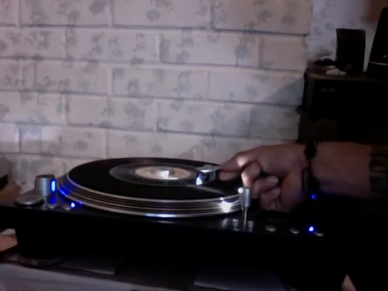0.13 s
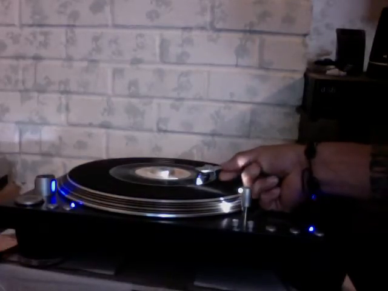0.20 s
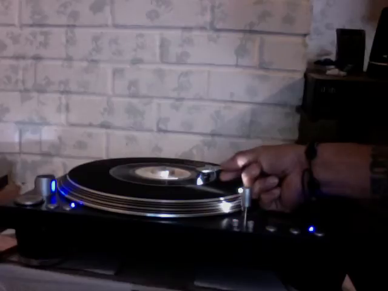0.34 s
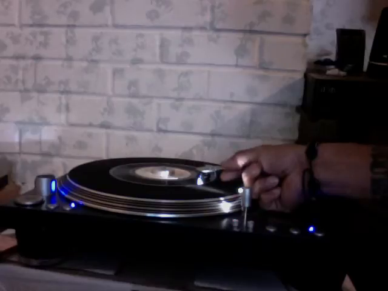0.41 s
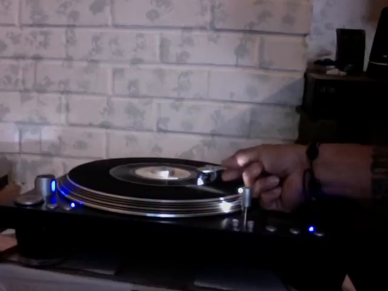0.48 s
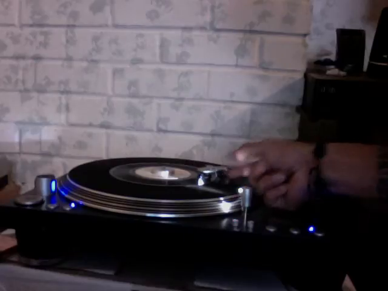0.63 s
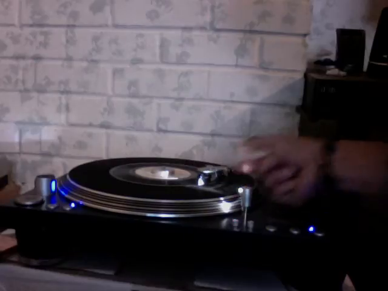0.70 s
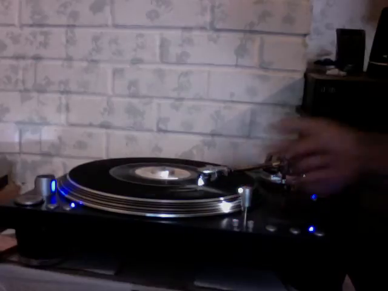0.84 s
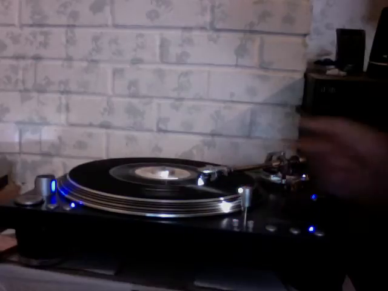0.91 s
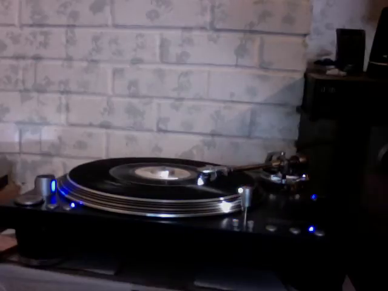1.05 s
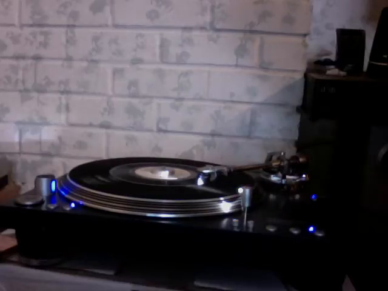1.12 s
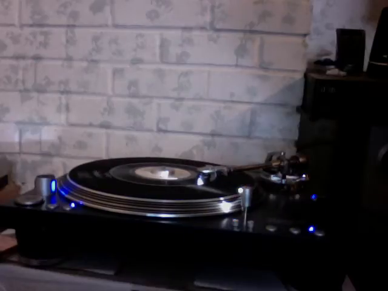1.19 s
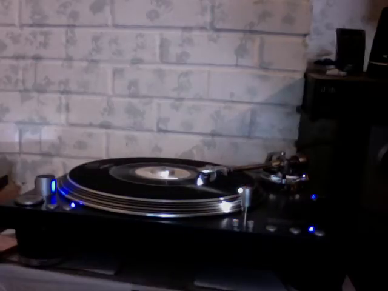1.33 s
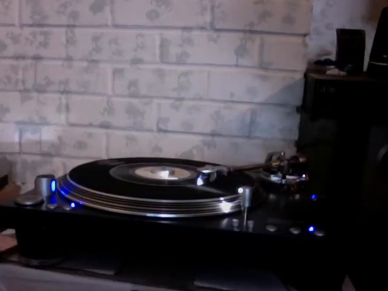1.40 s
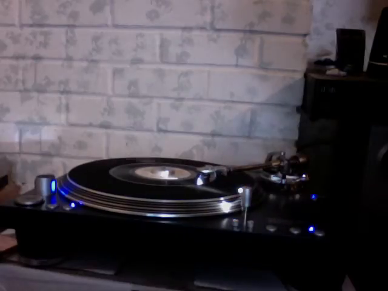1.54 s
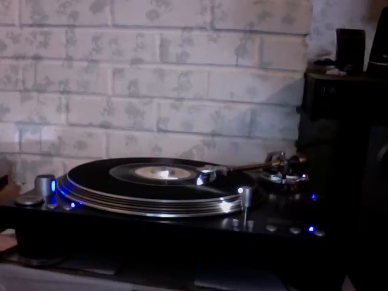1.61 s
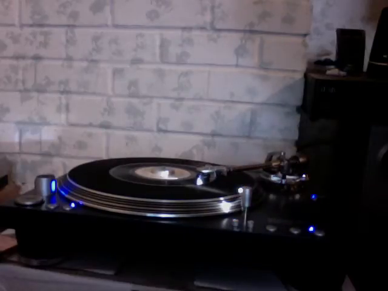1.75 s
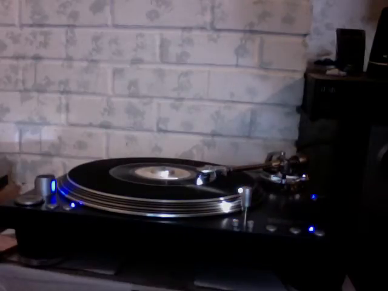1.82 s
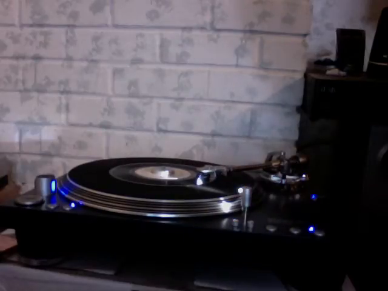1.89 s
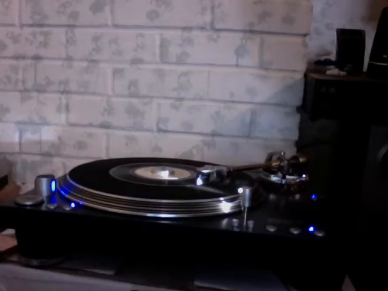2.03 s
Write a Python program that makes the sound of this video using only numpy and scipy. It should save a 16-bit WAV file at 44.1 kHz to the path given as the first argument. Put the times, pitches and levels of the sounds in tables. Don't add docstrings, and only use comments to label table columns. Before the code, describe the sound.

Vinyl crackle, dry and direct, almost all in the left channel, over steady groove hiss and low rumble. Sparse sharp clicks lead to a hard, clipped needle thump at 0.22 s. Pops thicken around 0.5, with another deep wobbling thump at 0.58 and a harsh crackle burst at 0.74. Dense pops peak at 1.07-1.15, smaller bumps follow at 1.33-1.53, then quieter, duller hiss and isolated ticks, one sharp at 1.86.

```python
import sys
import numpy as np
from scipy import signal
from scipy.fft import rfft, irfft
from scipy.io import wavfile

SR = 44100
rng = np.random.default_rng(int(sys.argv[2]) if len(sys.argv) > 2 else 0)


def magnitude_from_level(level_db):
    exponent = np.asarray(level_db, float) / 20
    return 10 ** exponent


def master(y):
    cut = np.clip(np.atleast_2d(y).T, -1, 1)
    pcm = np.round(cut * 32767)
    wavfile.write(sys.argv[1], SR, pcm.astype(np.int16))


N = 92610

# centre in Hz, width in Hz, level in dB.
RUMBLE = [
    (13.15, 1.8, -32),
    (29.3, 18, -39.5),
    (58, 37.6, -38.5),
    (113, 30, -68),
]
# start in seconds, signed height (1 = full scale),
# ringing pitch in Hz, time to fall by 60 dB in seconds.
JOLTS = [(.2235, -3, 150, .007), (.225, .64, 38, .19), (.2438, -4, 55, .016), (.2469, 1.6, 18, .09),
         (.5779, .54, 40.5, .24), (1.3288, .17, 14, .4), (1.4022, .18, 22, .09), (1.5312, -.2, 125, .04),
         (.887, .2, 110, .03), (.963, .08, 60, .12), (1.1438, .3, 65, .06), (.0875, .07, 330, .02),
         (1.3272, -.2, 150, .012), (1.3995, -.25, 130, .015)]
# start in seconds, signed height (1 = full scale),
# pitch in Hz, time to fall by 60 dB in seconds.
SWAYS = [
    (.29, .1, 27.3, 1.0),
    (.608, .3, 15.2, 1.3),
    (1.277, .09, 21, .5),
    (1.638, -.09, 28, .25),
    (1.724, .08, 29, .7),
    (.61, .06, 108, .7),
    (.93, .03, 120, .4),
]
# time in seconds, level in dB.
WEAR = [
    (0, -45.5),
    (.6, -44),
    (1.05, -40.5),
    (1.5, -47),
    (2.1, -53),
]
# frequency in Hz, level in dB per Hz.
HISS_COLOUR = [(60, -4), (250, -4), (1200, -24), (3500, -29), (9000, -39), (16000, -32)]
GRAIN_CUTS_HZ = [460, 3300, 2700]
# start in seconds, length in seconds, level in dB,
# share of fine grit from 0 to 1.
SCUFFS = [(0.054, 0.043, -41.5, 0.05), (0.123, 0.013, -36.5, 0.5), (0.22, 0.035, -31, 0.63),
          (0.33, 0.017, -39, 0.02), (0.413, 0.1, -41.5, 0.98), (0.507, 0.036, -33, 1),
          (0.541, 0.041, -30.5, 1), (0.569, 0.054, -37.5, 1), (0.62, 0.075, -42, 1),
          (0.663, 0.02, -35.5, 0.9), (0.699, 0.072, -35, 0.95), (0.736, 0.03, -23, 0.6),
          (0.768, 0.014, -36, 0.9), (0.875, 0.02, -32, 0.8), (0.936, 0.072, -31, 0.6),
          (0.989, 0.064, -39, 0.53), (1.077, 0.015, -23, 0.9), (1.103, 0.012, -23, 0.82),
          (1.13, 0.035, -24.5, 0.58), (1.214, 0.057, -37, 0.7), (1.327, 0.008, -30.5, 0.61),
          (1.377, 0.029, -34.5, 0.91), (1.485, 0.022, -38.5, 0.4), (1.531, 0.012, -30, 0.72),
          (1.548, 0.051, -31, 0.63), (1.604, 0.035, -38.5, 0.05), (1.765, 0.0037, -30.5, 0)]
# time in seconds, signed height (1 = full scale), width in ms.
POPS = [(0.0167, -0.54, 0.037), (0.0539, 0.32, 0.027), (0.0662, 0.12, 0.38), (0.132, 0.081, 0.05),
        (0.1387, 0.14, 0.12), (0.168, 0.6, 0.053), (0.1676, -0.11, 0.2), (0.18726, 0.24, 0.027),
        (0.20245, 0.52, 0.087), (0.203, 0.11, 0.48), (0.231, -0.033, 0.18), (0.232, -0.12, 0.24),
        (0.2417, -0.18, 0.068), (0.3341, -0.14, 0.24), (0.34388, -0.25, 0.069),
        (0.4187, -0.36, 0.057), (0.4214, 0.16, 0.12), (0.4215, -0.53, 0.071), (0.42977, 0.0079, 0.03),
        (0.4445, 0.63, 0.076), (0.4449, -0.056, 0.21), (0.51626, -0.22, 0.03), (0.52481, 0.17, 0.066),
        (0.53553, 0.41, 0.056), (0.5475, 0.6, 0.022), (0.54871, -0.22, 0.11), (0.5514, 0.43, 0.03),
        (0.5591, 0.81, 0.043), (0.55923, -0.11, 0.03), (0.565, -1.27, 0.043), (0.5702, 0.27, 0.08),
        (0.5744, 0.51, 0.025), (0.5734, 0.45, 0.026), (0.5777, -0.51, 0.4), (0.5947, 0.16, 0.066),
        (0.59642, -1.6, 0.094), (0.5965, 0.63, 0.18), (0.60243, 0.64, 0.1), (0.6064, 0.31, 0.13),
        (0.62977, -0.25, 0.042), (0.6319, 0.29, 0.073), (0.6365, -0.48, 0.084), (0.6676, 0.27, 0.12),
        (0.6707, 0.17, 0.18), (0.6705, -0.48, 0.073), (0.6711, 0.32, 0.1), (0.6727, -0.55, 0.048),
        (0.675, -0.32, 0.065), (0.67503, 0.38, 0.32), (0.6764, -0.15, 0.12), (0.6809, -0.18, 0.08),
        (0.6898, -0.19, 0.034), (0.7282, -0.36, 0.079), (0.7287, 0.065, 0.24), (0.7305, -0.34, 0.085),
        (0.7395, -1.5, 0.065),
        (0.7393, 0.13, 0.22), (0.7406, -0.14, 0.14), (0.7424, -0.24, 0.23), (0.7432, -0.88, 0.094),
               (0.7429, 0.63, 0.11), (0.7446, 0.5, 0.12), (0.7443, -0.6, 0.1), (0.7452, 0.72, 0.6),
               (0.7454, 0.23, 0.2), (0.7455, -0.54, 0.099), (0.7482, -0.42, 0.088), (0.7484, 0.41, 0.18),
               (0.74964, -0.42, 0.045), (0.7504, 0.41, 0.13), (0.7517, -0.39, 0.14), (0.75295, -0.2, 0.55),
               (0.75472, -0.58, 0.11), (0.7566, -0.47, 0.059), (0.75737, 0.31, 0.12), (0.7599, 0.49, 0.19),
               (0.80753, -0.31, 0.11), (0.8149, 0.16, 0.2), (0.8345, 0.11, 0.3), (0.8535, -0.22, 0.075),
               (0.87079, 0.27, 0.14), (0.8834, -0.25, 0.05), (0.8844, 0.2, 0.42), (0.8875, 0.23, 0.073),
               (0.88982, -0.27, 0.054), (0.9003, -0.2, 0.12), (0.93823, 0.24, 0.25), (0.9391, 0.2, 0.12),
               (0.9419, -0.22, 0.14), (0.9479, -0.18, 0.055), (0.9636, -0.28, 0.074), (0.974, 0.33, 0.13),
               (0.995, -0.13, 0.046), (0.9983, -0.33, 0.31), (0.99939, -0.38, 0.084), (0.99959, 0.44, 0.18),
               (1.0157, -0.29, 0.07), (1.0295, -0.3, 0.11), (1.0313, -0.44, 0.096), (1.0366, -0.22, 0.12),
               (1.04601, -0.38, 0.12), (1.0492, 0.26, 0.13), (1.051, -0.38, 0.094), (1.0607, -0.27, 0.057),
               (1.0732, -0.83, 0.12), (1.0745, 0.23, 0.074), (1.0734, -0.15, 0.031), (1.0748, -0.34, 0.071),
               (1.07732, -0.19, 0.088), (1.083, 0.006, 0.21), (1.0867, -0.41, 0.05), (1.1049, -0.35, 0.12),
        (1.11113, 0.086, 0.22), (1.12782, -0.51, 0.094), (1.128, -1.6, 0.14), (1.12825, 0.97, 0.12),
             (1.12859, 0.15, 1), (1.13345, -0.56, 0.23), (1.1337, 0.42, 0.098), (1.13537, -0.33, 0.099),
             (1.1371, -0.64, 0.043), (1.13882, -0.2, 0.059), (1.14381, -0.55, 0.054), (1.14399, 0.23, 0.15),
             (1.1442, 0.75, 0.42), (1.14492, 0.3, 1), (1.14599, -0.35, 0.056), (1.14694, -0.37, 0.21),
             (1.16041, -0.03, 0.13), (1.16066, -0.6, 0.16), (1.16127, -0.3, 0.1), (1.18122, -0.34, 0.094),
             (1.1893, 0.056, 1), (1.22862, 0.14, 0.23), (1.23583, -0.25, 0.19), (1.24132, -0.21, 0.27),
             (1.25014, -0.24, 0.12), (1.26662, 0.39, 0.18), (1.2724, -0.36, 0.29), (1.2881, 0.09, 0.25),
             (1.319, -0.2, 0.24), (1.32315, -0.11, 0.08), (1.32794, -0.12, 0.14), (1.32918, -0.12, 0.047),
             (1.35254, -0.16, 0.24), (1.38274, -0.15, 0.064), (1.39327, -0.055, 0.033),
             (1.40002, -0.28, 0.076), (1.40084, 0.18, 0.43), (1.40238, 0.21, 0.26), (1.4095, -0.22, 0.19),
             (1.50664, -0.075, 0.24), (1.53689, 0.049, 0.14), (1.53989, -0.062, 0.21),
             (1.55578, -0.17, 0.1), (1.55694, -0.18, 0.12), (1.56156, -0.26, 0.13), (1.5661, -0.16, 0.17),
             (1.57517, -0.17, 0.18), (1.57814, -0.25, 0.13), (1.60887, -0.15, 0.15),
             (1.69356, -0.062, 0.14), (1.76488, -0.029, 0.035), (1.76673, -0.088, 0.084),
             (1.77283, -0.18, 0.12), (1.81456, -0.13, 0.32), (1.86329, -0.59, 0.036),
             (1.86347, 0.079, 0.26)]
# time in seconds, peak level in dB.
TICKS = [
    (.0625, -23),
    (.150, -23),
    (.2945, -23),
    (.324, -19),
    (.397, -22),
    (.4655, -21),
    (1.702, -30),
    (1.850, -30),
    (1.891, -33),
    (1.995, -36),
]
PHONO_BASS_HZ = 287


def low(x, hz, order=1):
    return signal.sosfilt(signal.butter(order, hz, fs=SR, output="sos"), x + 1e-18)


def high(x, hz):
    return signal.sosfilt(signal.butter(1, hz, "high", fs=SR, output="sos"), x + 1e-18)


def rms_one(x):
    return x / np.sqrt(np.mean(x ** 2) + 1e-20)


def grains(per_s, spread_db, edge_hz):
    strength = magnitude_from_level(spread_db * np.minimum(rng.exponential(1, N), 3.5))
    kicks = strength * rng.choice([-1, 1], N) * (rng.random(N) < per_s / SR)
    size = rng.integers(0, 3, N)
    out = np.zeros(N)
    for k, hz in enumerate(GRAIN_CUTS_HZ):
        out += rms_one(low(kicks * (size == k), hz))
    return rms_one(high(low(out, edge_hz), PHONO_BASS_HZ))


def preamp_hiss():
    return magnitude_from_level(-65.5) * rng.standard_normal(N)


def rumble():
    out = np.zeros(N)
    for hz, width_hz, db in RUMBLE:
        r = np.exp(-np.pi * width_hz / SR)
        resonance = [1, -2 * r * np.cos(2 * np.pi * hz / SR), r * r]
        ring = signal.lfilter([1, 0, -1], resonance, rng.standard_normal(N + SR))
        out += magnitude_from_level(db) * rms_one(ring[SR:])
    return out


def jolts(t):
    full_rise_s = .0014
    out = np.zeros(N)
    for s, height, hz, t60 in JOLTS:
        u = np.maximum(t - s, 0)
        rise_s = full_rise_s * min(abs(height), 1)
        rise = 1 - np.exp(-(u / rise_s) ** 2)
        out += height * rise * np.cos(2 * np.pi * hz * u) * magnitude_from_level(-60 * u / t60)
    return low(out, 1200)


def sways(t):
    out = np.zeros(N)
    for s, height, hz, t60 in SWAYS:
        u = np.maximum(t - s, 0)
        out += height * np.sin(2 * np.pi * hz * u) * magnitude_from_level(-60 * u / t60)
    return out


def groove(t):
    hz = np.fft.rfftfreq(N, 1 / SR) + 1
    at_hz, at_db = np.transpose(HISS_COLOUR)
    colour = magnitude_from_level(np.interp(np.log(hz), np.log(at_hz), at_db)) * (hz > at_hz[0])
    hiss = rms_one(irfft(rfft(rng.standard_normal(N)) * colour, N))
    flicker = magnitude_from_level(2.5 * rms_one(low(rng.standard_normal(N), 32, order=2)))
    dust = grains(per_s=900, spread_db=4.8, edge_hz=1450)
    wall = magnitude_from_level(0.5) * flicker * hiss + magnitude_from_level(4) * dust

    wear_db = np.interp(t, *np.transpose(WEAR))
    body = low(wall, 1800)
    treble_gain = magnitude_from_level(.8 * (wear_db - wear_db.mean()))
    return magnitude_from_level(wear_db) * (body + treble_gain * (wall - body))


def scuffs(t):
    coarse_cut_hz, edge_s, trim_db = 3600, 0.0021, 1
    fine = grains(per_s=2600, spread_db=5.8, edge_hz=7500)
    rub = high(rng.standard_normal(N), coarse_cut_hz) * rms_one(low(abs(fine), 250))
    grit = fine + .3 * rub
    coarse = rms_one(low(fine, coarse_cut_hz, order=2))
    out = np.zeros(N)
    for s, length_s, db, share in SCUFFS:
        inside_s = np.minimum(t - s, s + length_s - t)
        gate = np.clip(inside_s / edge_s + .5, 0, 1)
        out += magnitude_from_level(db + trim_db) * gate * (share ** 2 * grit + (1 - share) * coarse)
    return out


def pops():
    ticks = [(s, magnitude_from_level(db), .03) for s, db in TICKS]
    n = np.arange(200)
    out = np.zeros(N + 200)
    for s, height, width_ms in POPS + ticks:
        tau = width_ms / 1000 / 2.5 * SR
        start = s * SR - 2 * tau
        first = int(start)
        u = np.maximum(n - start % 1, 0) / tau
        out[first:first + 200] += 1.142 * height * (u / 2) ** 2 * np.exp(2 - u)
    return high(out[:N], PHONO_BASS_HZ)


def scene():
    t = np.arange(N) / SR
    left = preamp_hiss() + rumble() + jolts(t) + sways(t) + groove(t) + scuffs(t) + pops()
    return np.array([left, np.zeros(N)])


def roll_off(x):
    return signal.sosfilt(signal.butter(12, 16450, fs=SR, output="sos"), x)


def record(dry):
    left = np.clip(dry[0], -.99, .99)
    leak = magnitude_from_level(-59) * low(left, 90) + magnitude_from_level(-33) * high(left, 9000)
    right = leak + magnitude_from_level(-92) * rng.standard_normal(N)
    top_cut = signal.cheby2(12, 30, 16250, fs=SR, output="sos")
    mix = signal.sosfiltfilt(top_cut, [left, right])
    return roll_off(mix)


dry = scene()
out = record(dry)
master(out)
```